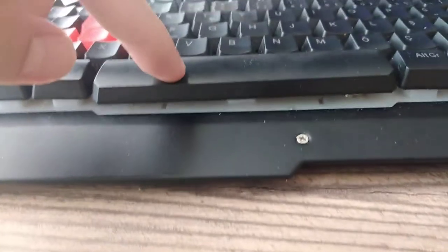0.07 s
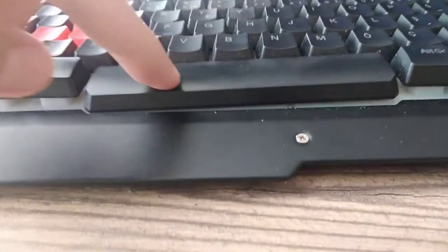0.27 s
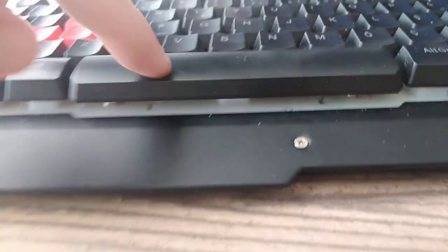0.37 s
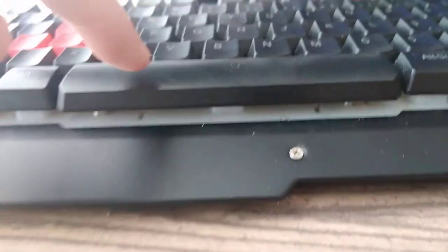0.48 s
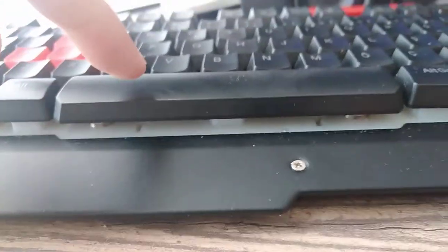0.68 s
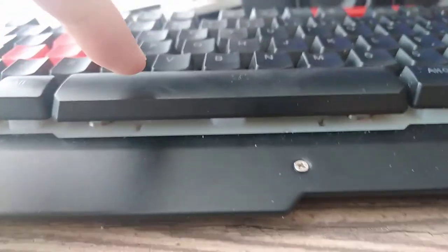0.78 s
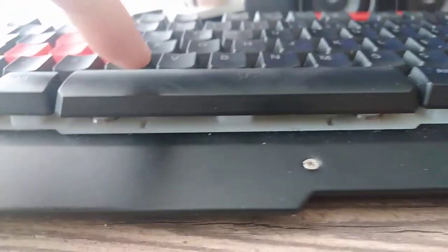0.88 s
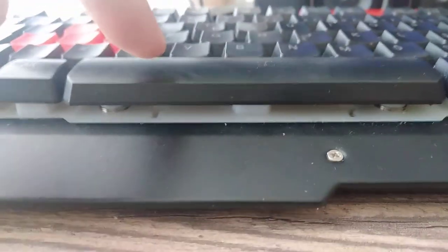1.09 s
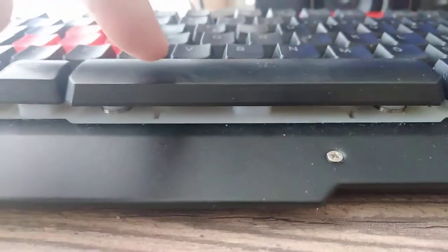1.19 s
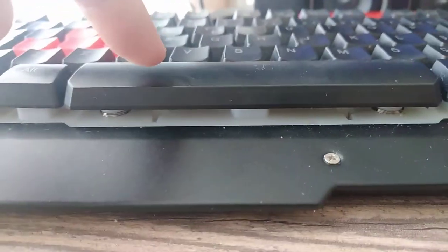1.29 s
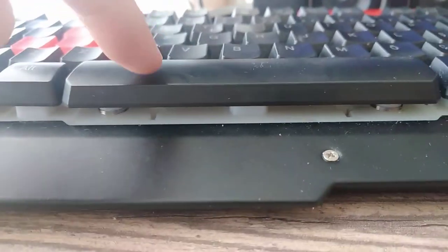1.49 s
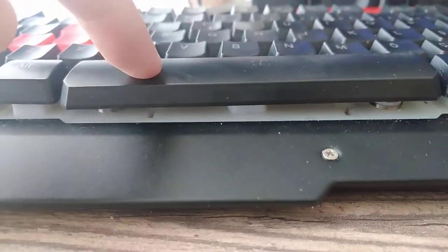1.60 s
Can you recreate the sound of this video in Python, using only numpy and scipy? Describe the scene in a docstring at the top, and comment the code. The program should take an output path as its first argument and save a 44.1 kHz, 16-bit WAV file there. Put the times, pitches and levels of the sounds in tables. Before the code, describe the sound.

A keyboard space bar clacks once sharply, then rattles briefly as it is released.

```python
"""A plastic space bar snaps once in a small room, close to the right microphone of a hand-held camera.
Its two ends hit their stop and make the plastic ring; a wall and the room echo the snap.
The bar then knocks in its guides, and the wire that keeps it level rattles as it comes free.
Fingers tap faintly before and after. Under it all lie a low room rumble, a faint hum,
a thin hiss and the soft noise of hands holding the camera."""
import sys
import numpy as np
from scipy import signal
from scipy.fft import rfft, irfft, next_fast_len
from scipy.io import wavfile
from scipy.ndimage import map_coordinates

SR = 44100
rng = np.random.default_rng(int(sys.argv[2]) if len(sys.argv) > 2 else 0)


def store_pcm(level_fs):
    """Save levels as 16-bit WAV."""
    pcm = np.round(np.clip(level_fs, -1, 1) * 32767).astype(np.int16)
    wavfile.write(sys.argv[1], SR, np.atleast_2d(pcm).T)


N = 72765  # samples: 1.65 s


def amp(db):
    """Turn decibels into a gain to multiply by."""
    return 10 ** (np.asarray(db) / 20)


def along(points, hz):
    """Read a value between (frequency, value) points, on a log frequency scale."""
    freqs, values = np.transpose(points)
    return np.interp(np.log(hz + 1), np.log(freqs + 1), values)


def pan(db):
    """Left and right gains that put the left side db above the right."""
    return amp(np.array([[db], [-db]]) / 2)


def left_gain(db):
    """Left and right gains that change only the left side."""
    return amp([[db], [0]])


def since(start):
    """Seconds since start at every sample, zero before it."""
    return np.maximum(np.arange(N) / SR - start, 0)


def strike(start, fade, attack):
    """The loudness of a hit: a quick rise, then a fall of 60 dB per fade time. All in seconds."""
    t = since(start)
    return (1 - np.exp(-t / attack)) * np.exp(-np.log(1000) * t / fade)


def wobble(rate):
    """A smooth curve through rate random points a second."""
    return map_coordinates(rng.standard_normal(N // 100), [np.arange(N) * rate / SR + 2], mode="wrap")


def filtered(x, gain_at):
    """Scale each frequency in x by gain_at(frequency)."""
    size = next_fast_len(N + SR // 4)
    return irfft(rfft(x, size) * gain_at(np.fft.rfftfreq(size, 1 / SR)), size)[..., :N]


def noise(colour):
    """Noise of average power 1; its colour says which frequencies are strong or weak."""
    x = filtered(rng.standard_normal(N), lambda hz: amp(along(colour, hz)))
    return x / np.sqrt(np.mean(x ** 2) + 1e-20)


def stereo_noise(colour, alike=0):
    """Left and right noise; alike (0 to 1) is the share both sides have in common."""
    common = noise(colour)
    separate = np.array([noise(colour), noise(colour)])
    return np.sqrt(alike) * common + np.sqrt(1 - alike) * separate


def background():
    """Room rumble and the noise of hands swell and sink over a wavering hum and a thin hiss."""
    # how the room's rumble and the noise of hands rise and fall (time [s], level [dB])
    room_levels = [(0.0, -59), (0.344, -52.5), (0.726, -58), (0.968, -54), (1.138, -57.5), (1.152, -51),
                   (1.23, -56.5), (1.474, -58.5), (1.516, -55), (1.57, -61.5), (1.63, -52.5), (1.65, -71)]
    hand_levels = [(0.0, -63), (0.086, -55.5), (0.124, -78), (0.164, -59.5), (0.34, -59), (0.376, -63.5),
                   (0.656, -57.5), (0.744, -78), (0.762, -60), (0.794, -63), (0.836, -53.5), (0.864, -64.5),
                   (0.946, -53.5), (1.12, -66.5), (1.162, -57.5), (1.492, -71), (1.516, -61.5),
                   (1.65, -64.5)]
    # colours of the rumble, its hollow upper part, hands and hiss (frequency [Hz], relative level [dB])
    rumble_colour = [(25, -36.5), (50, -20.5), (70, -6.5), (100, -6.5), (140, -4), (255, 1.5), (310, -4.5),
                     (350, -2.5), (420, -20.5), (520, -30), (900, -59.5)]
    hollow_colour = [(380, -21), (500, -14), (600, -2), (650, -3), (710, 4.5), (780, -4.5), (860, -16.5),
                     (960, -32), (1400, -54.5)]
    hand_colour = [(25, -31.5), (48, -18.5), (66, -5), (95, -0.5), (140, -5.5), (220, -13.5), (400, -29),
                   (800, -61.5)]
    hiss_colour = [(200, 1), (1000, 2.5), (2000, 0), (4000, -5.5), (8000, -6.5), (12000, -9), (14000, -10)]
    # the tones of the hum (pitch [Hz], level [dB])
    hum_tones = [(98, -71.5), (257, -64.5), (339, -63.5), (704, -82)]
    t = since(0)
    swell = amp(np.interp(t, *np.transpose(room_levels)))
    grip = amp(np.interp(t, *np.transpose(hand_levels)))
    rumble = amp(-1) * stereo_noise(rumble_colour, alike=0.66)
    hands = amp(-0.5) * pan(12) * stereo_noise(hand_colour, alike=0.28)
    hollow = amp(-9.5 + 2.4 * wobble(45)) * pan(-8) * stereo_noise(hollow_colour, alike=0.33)
    hum = 0
    for hz, db in hum_tones:
        hum += amp(db + 1.5 * wobble(8)) * np.sin(2 * np.pi * hz * t + 0.95 * wobble(9))
    hiss = amp(-82.5) * stereo_noise(hiss_colour, alike=0.1)
    return swell * (rumble + hollow) + grip * hands + hum + hiss


def finger_taps():
    """Fingers touch the key and camera: each tap is a soft tone with a scuff and a faint after-ring."""
    # the taps (time [s], level [dB], pitch [Hz], left over right [dB], scuff [dB], after-ring [dB])
    taps = [(0.092, -71.5, 3000, -37.5, -49, -30), (0.089, -65.5, 7520, -33, -28, -28),
            (0.166, -60, 1250, 13, -27, -18), (0.565, -51.5, 1552, 24.5, -6, -23.5),
            (1.174, -59, 1232, 28, -9.5, -16), (1.177, -63.5, 1710, 26, 0, -13.5),
            (1.601, -60, 1143, -3.5, -13, -18.5), (1.613, -63, 1460, 24.5, -1, -21)]
    # colour of a finger's scuff (frequency [Hz], relative level [dB])
    scuff_colour = [(400, -25), (900, 8), (1700, 0), (2400, -12), (3200, -23.5), (8000, -40)]
    out = np.zeros((2, N))
    for start, db, hz, side_db, scuff_db, ring_db in taps:
        touch = 2 * strike(start, fade=0.013, attack=0.004)
        after_ring = amp(ring_db) * strike(start, fade=0.17, attack=0.004)
        tone = np.sin(2 * np.pi * hz * since(start) + 0.24 * wobble(300))
        scuff = amp(scuff_db) * noise(scuff_colour)
        out += amp(db) * pan(side_db) * (touch + after_ring) * (tone + scuff)
    return out


def bar_snap():
    """The bar hits its stop, one end after the other, and rings; a wall and the room answer."""
    # the hit of each end (level [dB], treble lift [dB per octave], left gain [dB])
    ends = [(-25, 3, -5), (-24, -3, 0)]
    # the tones the bar rings at (pitch [Hz], level [dB], fade time [s], left gain [dB])
    bar_tones = [(1260, -18, 0.0064, -11), (2280, -23, 0.025, 16), (2650, -15, 0.013, 4),
                 (3012, 6, .015, -13), (3525, -14.5, 0.011, -16.5), (4240, -4.5, 0.018, -9),
                 (5140, -3.5, 0.013, -10), (6040, -12.5, 0.01002, -11), (7033, -6.5, 0.023, -13),
                 (8000, -12.5, 0.0081, -15), (8930, 0.5, 0.01175, -22.5), (10667, -16.5, .012, -8),
                 (11760, -24.5, .01, -17.5)]
    # colours of the plastic's crack and of the echo on each side (frequency [Hz], relative level [dB])
    crack_colour = [(100, -49.5), (400, -26.5), (900, -9), (2500, 1), (5500, -8), (9000, -7.5),
                    (10500, -16.5), (14000, -22.5)]
    echo_left = [(200, -14), (700, -2.5), (1400, -3), (2500, 0.5), (3600, -5.5), (5200, 0.5), (7000, -10.5),
                 (9000, -16.5), (13500, -21.5)]
    echo_right = [(200, -13.5), (700, 1), (1400, 0), (2500, -2.5), (3600, -4.5), (5200, 5), (7000, 4),
                  (8000, -8.5), (9700, -8), (13500, -24.5)]
    start, end_gap, left_lag, wall_delay = 0.20852, 0.00117, 0.0004, 0.0108  # seconds
    # the first instant of contact is a tiny, bright click
    click_hz, click_width_s, click_delay_s = 6494, 0.00009, 0.00018
    t = since(0) - start - click_delay_s
    click = np.cos(2 * np.pi * click_hz * t) * np.exp(-(t / click_width_s) ** 2 / 2)
    out = amp(-9.5) * left_gain(-20) * click
    for end, (db, lift_db, end_left_db) in enumerate(ends):
        arrival = start + end * end_gap + np.array([[left_lag], [0]])
        for hz, tone_db, fade, tone_left_db in bar_tones:
            ring = np.sin(2 * np.pi * hz * since(arrival)) * strike(arrival, fade, attack=0.00004)
            ring_db = db + tone_db + lift_db * np.log2(hz / 4000) + rng.normal(0, 1)
            out -= amp(ring_db) * left_gain(tone_left_db + end_left_db) * ring
        crack = stereo_noise(crack_colour) * strike(arrival, fade=0.011, attack=0.0002)
        out += amp(db + 3) * left_gain(-13) * crack
    wall = amp(-5.5) * np.array([noise(echo_left), noise(echo_right)])
    wall *= strike(start + wall_delay, fade=0.02053, attack=0.002)
    room = amp(-17) * pan(-2.5) * room_echo(start, echo_left, echo_right)
    first_hit_db = ends[0][0]
    return out + amp(first_hit_db) * (wall + room)


def room_echo(start, left_colour, right_colour):
    """The wash of sound left in the room after a hit; each frequency dies away at its own speed."""
    # how long the room takes to fade by 60 dB (frequency [Hz], fade time [s])
    fade_times = [(300, .45), (1500, 0.54), (6000, .41), (13000, 0.42)]
    wash = np.array([noise(left_colour), noise(right_colour)])
    hz, t, bands = signal.stft(wash, SR, nperseg=256)
    fall = np.exp(-np.log(1000) * np.maximum(t - start, 0) / along(fade_times, hz)[:, None])
    _, echo = signal.istft(bands * fall, SR, nperseg=256)
    rise = 1 - np.exp(-since(start) / 0.0012)
    return echo[:, :N] * rise


def guide_knocks():
    """The bar bumps its guides: each knock is a dull, short tone with a tick and a brief plastic ring."""
    # the knocks (time [s], level [dB], pitch [Hz], left over right [dB], fade time [s],
    # tick [dB], ring [dB])
    knocks = [(0.302, -49, 1440, -14, 0.0029, -27, 5), (.3047, -42, 770, -6, 0.023, -26, 9.5),
              (0.3427, -44, 1060, 13, 0.0065, -33, -5), (0.3463, -41.5, 1120, 14.5, 0.0041, -0.5, 2.5),
              (0.3537, -39, 1110, 31.5, 0.0018, -11, -15.5), (0.3809, -25.5, 970, 1, 0.0012, -31, -15),
              (0.4263, -43.5, 820, 0, 0.0042, -30, -3)]
    # colours of the tick and the plastic ring (frequency [Hz], relative level [dB])
    tick_colour = [(200, -15), (1000, -5), (2500, -12), (5000, -7), (8000, 3), (13000, -11)]
    ring_colour = [(200, -46), (700, 4.5), (1300, -7.5), (2600, -6.5), (3500, -20), (7000, -17.5),
                   (12000, -35.5)]
    out = np.zeros((2, N))
    for start, db, hz, side_db, fade, tick_db, ring_db in knocks:
        tone = np.sin(2 * np.pi * hz * since(start)) * strike(start, fade, attack=0.0003)
        tick = stereo_noise(tick_colour) * strike(start, fade=0.0019, attack=0.00005)
        ring = stereo_noise(ring_colour) * strike(start, fade=0.014, attack=0.0009)
        out += amp(db) * pan(side_db) * (2 * tone + amp(tick_db) * tick + amp(ring_db) * ring)
    return out


def wire_rattle():
    """The wire chatters in its holders: quick bursts, each led by a bright tick, echo in the room."""
    # the bursts (time [s], level [dB], fade time [s])
    bursts = [(0.384, -42.5, 0.005), (0.3851, -40, 0.034), (0.394, -45, 0.07), (0.3995, -38, 0.012),
              (0.402, -40.5, 0.065), (0.4224, -51, 0.017), (0.4236, -44.5, 0.075)]
    # colours of the tick and of the wire on each side (frequency [Hz], relative level [dB])
    tick_colour = [(500, -30), (2500, -6), (6800, 6), (9000, -6), (13500, -16)]
    wire_left = [(200, -28), (750, 7), (1100, 4), (1700, -14), (2300, -0.5), (3400, -12), (6700, -15),
                 (7700, -28), (13500, -23)]
    wire_right = [(200, -34), (750, 2), (1100, 4), (1600, -5.5), (2400, -3), (4200, -7.5), (6900, 0.5),
                  (8000, -11.5), (10000, -11), (13500, -19.5)]
    attack = 0.00071  # seconds
    out = np.zeros((2, N))
    for start, db, fade in bursts:
        tick = amp(0.5) * left_gain(-3) * stereo_noise(tick_colour)
        tick *= strike(start, fade=0.0041, attack=attack)
        burst = np.array([noise(wire_left), noise(wire_right)]) * strike(start, fade, attack)
        echo = amp(-21) * room_echo(start, wire_left, wire_right)
        out += amp(db) * (tick + burst + echo)
    return left_gain(-3) * out


def thin_bass(x, cutoff_hz=520):
    """Small parts move little air, so they give off little bass."""
    return signal.sosfilt(signal.butter(3, cutoff_hz, "high", fs=SR, output="sos"), x)


def scene():
    """The sounds of the key, with the finger taps and the background."""
    key = thin_bass(bar_snap() + wire_rattle() + guide_knocks())
    return key + finger_taps() + background()


def record(dry):
    """The camera cuts off the very highest treble."""
    top_hz = 14000
    return filtered(dry, lambda hz: 1 / np.sqrt(1 + (hz / top_hz) ** 100))


dry = scene()
out = record(dry)
store_pcm(out)
```